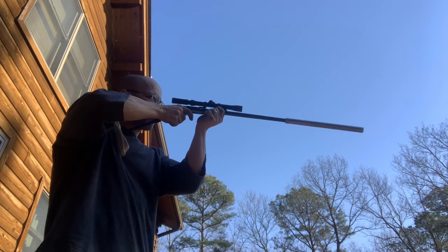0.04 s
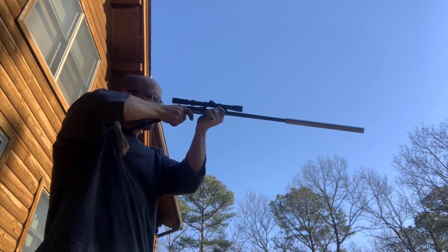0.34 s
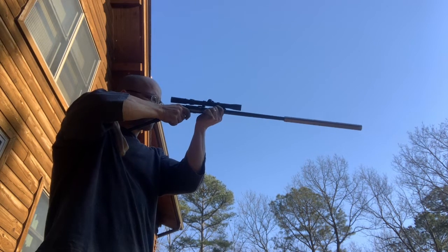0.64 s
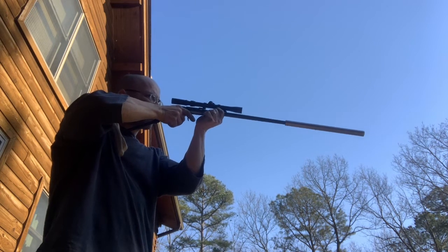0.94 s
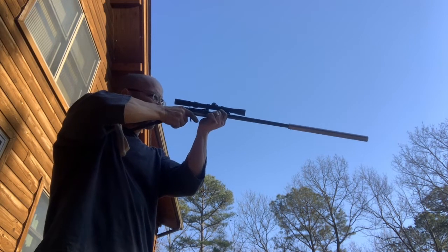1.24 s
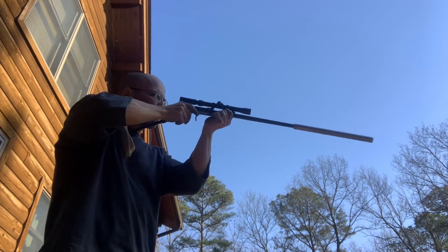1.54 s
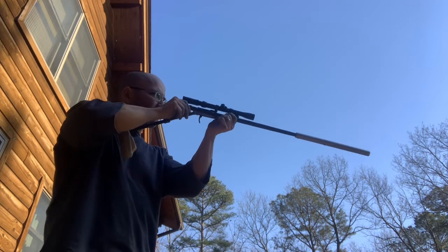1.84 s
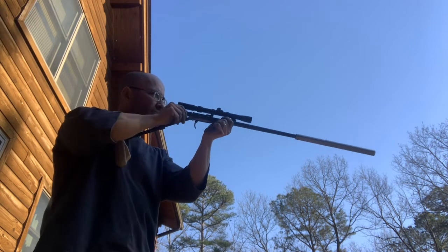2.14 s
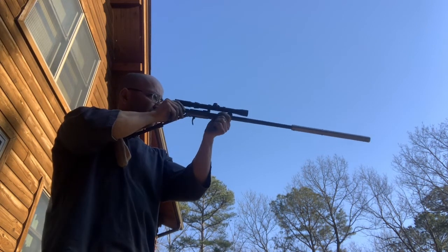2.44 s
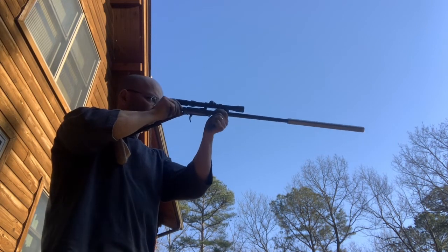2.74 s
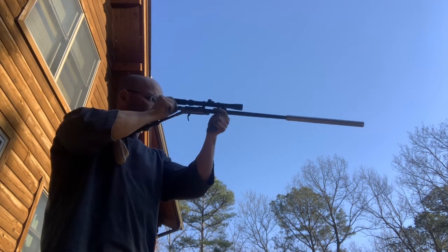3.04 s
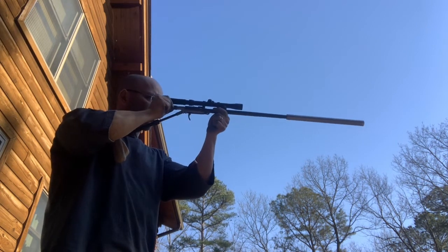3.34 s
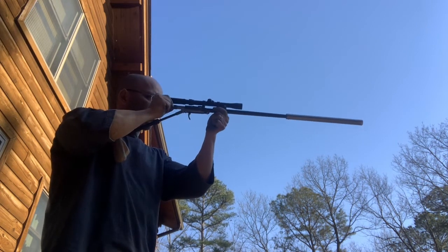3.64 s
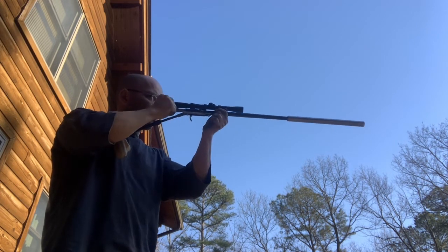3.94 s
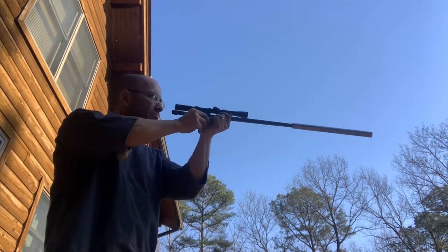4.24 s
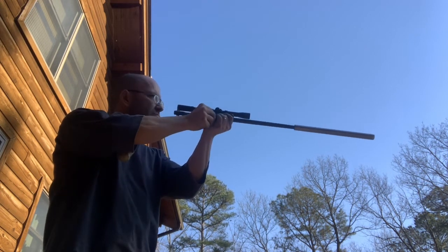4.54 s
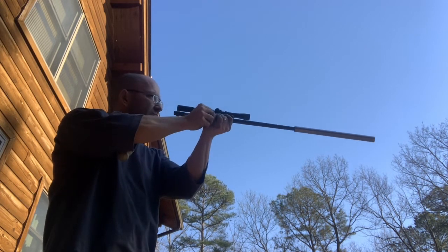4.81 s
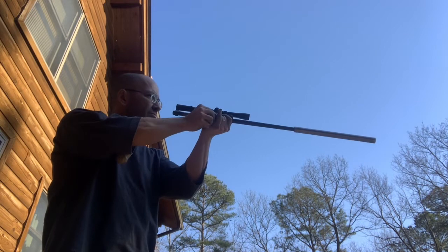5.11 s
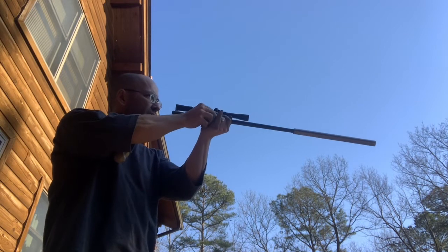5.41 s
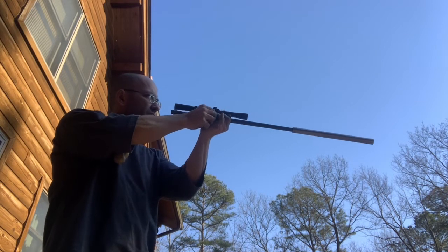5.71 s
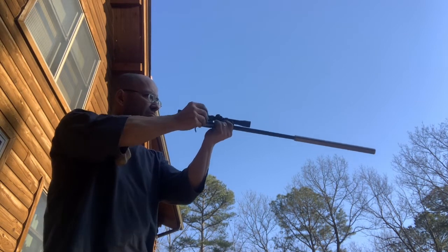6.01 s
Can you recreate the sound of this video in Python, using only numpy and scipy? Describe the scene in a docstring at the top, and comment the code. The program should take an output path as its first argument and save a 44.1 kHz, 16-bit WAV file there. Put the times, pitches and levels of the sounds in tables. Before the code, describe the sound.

Over a low outdoor hush, a suppressed bolt-action rifle fires once with a sharp crack and a short thump. The report slaps back from the yard, returns from the trees and rolls away into the woods. The bolt is then worked with faint steel slides and a sharp click. A brass case rings out and bounces four times on hard ground, before one last soft slide of the bolt. The microphone is near the shooter.

```python
"""One shot from a suppressed bolt-action rifle beside a timber house, facing a line of bare trees.
Over a low outdoor hush the striker falls; at 0.6 s gas bursts from the suppressor with a crack and thump.
The report returns from the yard, then from the trees, and rolls away in the woods. From 2 s the bolt
is worked, steel on steel. At 3.1 s the brass case is flicked out ringing; it bounces four times
on hard ground before a last faint slide of the bolt. The house wall scatters these small sounds."""
import sys
import numpy as np
from scipy import signal
from scipy.fft import rfft, irfft
from scipy.io import wavfile
from scipy.ndimage import uniform_filter1d

SR = 44100
rng = np.random.default_rng(int(sys.argv[2]) if len(sys.argv) > 2 else 0)


def int16_out(signal):
    """Quantize to a 16-bit WAV file."""
    q = np.round(np.clip(np.atleast_2d(signal).T, -1, 1) * 32767)
    wavfile.write(sys.argv[1], SR, q.astype(np.int16))


N = 267502
T = np.arange(N) / SR
HZ = np.maximum(np.fft.rfftfreq(N, 1 / SR), 1)
SHORT = 2 ** 15   # samples per short event
SHORT_T = np.arange(SHORT) / SR
SHORT_HZ = np.maximum(np.fft.rfftfreq(SHORT, 1 / SR), 1)
MUZZLE_S, WOODS_PEAK_S = .6002, .66


def from_db(db):
    """Decibels to gain."""
    return 10 ** (np.asarray(db) / 20)


def rms_one(x):
    """Scale to unit rms."""
    return x / np.sqrt(np.mean(x ** 2) + 1e-20)


def at_hz(points, hz, column=1):
    """Interpolate a table column over log frequency."""
    table = np.array(points)
    return np.interp(np.log(hz), np.log(table[:, 0]), table[:, column])


def resonances(modes, hz):
    """Gain of resonant peaks, summed in power."""
    return np.sqrt(sum(from_db(db) ** 2 / (1 + (centre / width * (hz / centre - centre / hz)) ** 2)
                       for centre, width, db in modes))


def resonate(x, modes):
    """Ring x through parallel resonators, signs alternating."""
    out = 0
    for k, (hz, width_hz, db) in enumerate(modes):
        r = np.exp(-np.pi * width_hz / SR)
        poles = [1, -2 * r * np.cos(2 * np.pi * hz / SR), r * r]
        out += (-1) ** k * from_db(db) * (1 - r * r) / 2 * signal.lfilter([1, 0, -1], poles, x)
    return out


def noise(gain):
    """Unit-rms random-phase noise, shaped by a gain per bin."""
    return rms_one(irfft(gain * np.exp(2j * np.pi * rng.random(len(gain)))))


def flicker(size, rms_db, smooth_samples):
    """Randomly wandering gain."""
    return from_db(rms_db * rms_one(uniform_filter1d(rng.standard_normal(size), smooth_samples)))


def tilted(gain, db_per_oct):
    """Tilt a short spectrum about 1 kHz; constant gain below 200 Hz."""
    return gain * from_db(db_per_oct * np.log2(np.maximum(SHORT_HZ, 200) / 1000))


def fade(t, t60_s):
    """Silence before t = 0, then exponential decay."""
    return (t >= 0) * np.exp(-np.log(1000) * np.maximum(t, 0) / t60_s)


def swell(t, rise_s, t60_s):
    """Gaussian rise to t = 0, then exponential decay."""
    return np.where(t < 0, np.exp(-.5 * (t / rise_s) ** 2), fade(t, t60_s))


def struck_mode(t, hz, db, t60_s):
    """One mode struck at t = 0."""
    return from_db(db) * np.sin(2 * np.pi * hz * t) * fade(t, t60_s)


def add(out, start_s, sound):
    """Mix a sound into out."""
    i = max(round(start_s * SR), 0)
    out[i:i + len(sound)] += sound[:N - i]


def shot(striker_s=.5798, tube_s=.5955, gas_peak_s=.5985, build_db_per_s=1550):
    """The striker ticks; gas builds in the suppressor, rings its tube and peaks in a crack and thumps."""
    # Each row: frequency in Hz, spectral level in dB.
    crack_spectrum = [(200, -16.5), (1500, -14), (2900, 1.5), (3900, -12), (5700, -1.5), (7500, -3),
                      (10300, -6.5), (12500, -9.5), (15200, -2), (17000, -12.5)]
    # Suppressor gas resonances. Each row: centre in Hz, width in Hz, level in dB.
    gas_modes = [(160, 76, -4), (270, 170, 2), (464, 85, -2.5), (740, 180, -9.5), (1310, 180, -1.5),
                 (1834, 130, -0.5), (2491, 110, 1.5), (2713, 43, 6.5), (3280, 89, 3), (5760, 950, -7),
                 (8100, 330, -1.5), (10532, 1200, -10)]
    # Tube rung by bullet and gas. Each row: frequency in Hz, peak in dB, t60 in seconds.
    tube_modes = [(1294, -20.5, .02), (2790, -12.5, .025)]
    # Ringing of the report. Each row: frequency in Hz, peak in dB, t60 in seconds.
    thumps = [(51.37, -25.5, 0.087), (167, -29, .1), (446.6, -12.5, .03), (5800, -11, 0.0054)]
    out, t = np.zeros(N), striker_s + SHORT_T
    colour = from_db(at_hz(crack_spectrum, SHORT_HZ))
    striker = from_db(-33) * noise(colour) * fade(SHORT_T, t60_s=.014)
    build = from_db(-build_db_per_s * np.maximum(gas_peak_s - t, 0))
    drain = fade(np.maximum(t - gas_peak_s, 0), t60_s=.052)
    gas = from_db(-13.5) * build * drain * noise(resonances(gas_modes, SHORT_HZ))
    crack = from_db(-9.5) * noise(colour) * swell(t - MUZZLE_S, rise_s=.0011, t60_s=.016)
    add(out, striker_s, striker + gas + crack)
    for hz, db, t60_s in tube_modes:
        out += struck_mode(T - tube_s, hz, db, t60_s)
    for hz, db, t60_s in thumps:
        lag_s = .0072 * np.sqrt(100 / hz)   # lower thumps start later
        out += struck_mode(T - MUZZLE_S - lag_s, hz, db, t60_s)
    return out


def echo(peak_s, db, rise_s, t60_s, db_per_oct):
    """A grainy cloud of small reflections of the report."""
    # Each row: frequency in Hz, spectral level in dB.
    echo_spectrum = [(60, -23.5), (120, -16.5), (220, -0.5), (500, 5), (620, -6), (1150, -3.5),
                     (2100, -7.5), (3000, 1.5), (4200, -7.5), (5900, -2.5), (8000, -6.5), (10000, -4),
                     (12000, -12), (16000, -13.5)]
    out, lead_s = np.zeros(N), .1
    grain = rms_one(flicker(SHORT, rms_db=1.5, smooth_samples=40))
    colour = tilted(from_db(at_hz(echo_spectrum, SHORT_HZ)), db_per_oct)
    envelope = from_db(db) * swell(SHORT_T - lead_s, rise_s, t60_s)
    add(out, peak_s - lead_s, noise(colour) * grain * envelope)
    return out


def yard(slap_s=.6438):
    """Nearby surfaces return the report, one as a hard slap with a hollow ring."""
    # Each row: peak time in seconds, level in dB.
    broad_returns = [(.6212, -17.5), (.639, -17), (.652, -16)]
    out = echo(slap_s, db=-11.5, rise_s=.0012, t60_s=.023, db_per_oct=-1.5)
    out += struck_mode(T - slap_s, hz=503, db=-21.5, t60_s=.12)
    for peak_s, db in broad_returns:
        out += echo(peak_s, db, rise_s=.0055, t60_s=.076, db_per_oct=-.27)
    return out


def trees(far_s=1.4, far_gap_s=.16, far_db=-67.5, far_loss_db_per_s=8, far_rise_s=.027):
    """Twigs return mostly treble; far stands ring longer, deep or far ones are duller."""
    # Each row: peak time in seconds, level in dB, rise in seconds (longer for a deeper stand).
    stands = [(.6865, -20.5, .0004), (.706, -20.5, .009), (.785, -30, 0.013), (.853, -34, 0.0018),
              (.93, -36, 0.003), (1.015, -41.5, 0.026), (1.187, -53, 0.0033), (1.225, -53, 0.023)]
    lags_s = far_gap_s * (np.arange(3) + rng.uniform(-.025, .099, size=3))
    far_stands = [(far_s + lag_s, far_db - far_loss_db_per_s * lag_s, far_rise_s) for lag_s in lags_s]
    out = np.zeros(N)
    for peak_s, db, rise_s in list(stands) + far_stands:
        travel_s = peak_s - MUZZLE_S
        depth_doublings = np.log2(rise_s / .001)
        db_per_oct = 13 - 1.82 * depth_doublings - 1.5 * travel_s
        out += echo(peak_s, db, rise_s, t60_s=.14 + .45 * travel_s, db_per_oct=db_per_oct)
    return out


def woods(rise_s=.013, roll_t60_s=3.16):
    """Diffuse reverberation dies band by band; a faint, uneven roll lingers from far away."""
    # Each row: frequency in Hz, spectral level in dB, t60 in seconds.
    reverb_bands = [(50, -24, .3), (120, -12, .45), (280, 5, 0.46), (507, 1, .65), (901, -1.5, 1),
                    (2080, -3.5, 0.94), (3100, 2, 0.88), (4374, -8, .7), (6000, -2, 0.64),
                    (10000, -8.5, 0.64), (16000, -15.5, 0.6)]
    # Each row: frequency in Hz, spectral level in dB.
    roll_spectrum = [(100, -14.5), (270, 0), (500, -1), (1200, 2), (3100, -3.5), (4300, -12.5),
                     (6500, -11.5), (10000, -13.5), (16000, -20.5)]
    size = 2 ** 17
    t = np.arange(size) / SR + MUZZLE_S - WOODS_PEAK_S
    hz = np.maximum(np.fft.rfftfreq(size, 1 / SR), 1)
    reverb = from_db(-25) * rfft(noise(from_db(at_hz(reverb_bands, hz))))
    roll = from_db(-48) * rfft(noise(from_db(at_hz(roll_spectrum, hz))))
    edges_hz = 30 * 2 ** np.arange(0, 10, .66)
    tail, out = 0, np.zeros(N)
    for low, high in zip(edges_hz, edges_hz[1:]):
        band = (hz >= low) & (hz < high)
        t60_s = at_hz(reverb_bands, np.sqrt(low * high), column=2)
        clumps = flicker(size, rms_db=1.5, smooth_samples=900)   # trees stand in groups
        tail += irfft(reverb * band) * swell(t, rise_s, t60_s)
        tail += irfft(roll * band) * swell(t, rise_s, roll_t60_s) * clumps
    add(out, MUZZLE_S, tail)
    return out


def low_ring():
    """A narrow, wavering low ring hangs under the tail."""
    # One row: centre in Hz, width in Hz, level in dB.
    ring_mode = [(266, 22, 0)]
    envelope = from_db(-62) * swell(T - WOODS_PEAK_S, rise_s=.03, t60_s=5)
    return noise(resonances(ring_mode, HZ) ** 2) * envelope


def bolt(chatter_gap_s=.011, scrape_low_hz=1800):
    """Steel knocks and slides, each with a dying chatter, ring the modes of the action."""
    # Each row: start in seconds, level in dB, t60 in seconds (long for a slide), tilt in dB per octave.
    strokes = [(2.002, -58.5, 0.14, -2), (2.3752, -59, 0.029, -5), (2.438, -41, 0.0097, -4.5),
               (2.56, -68, 0.16, 5), (3.0873, -35.5, .008, 0), (3.096, -23, .01, 3), (4.931, -51, .11, -5)]
    # Each row: centre in Hz, width in Hz, level in dB.
    action_modes = [(1220, 610, -6.5), (1920, 430, -4.5), (3200, 480, -4), (4055, 280, -2),
                    (5320, 1060, -3.5), (6250, 310, 6), (7160, 650, -1.5), (9050, 200, 4), (9616, 260, 3),
                    (10600, 510, 0.5), (13200, 940, -8), (14700, 450, 2), (15500, 500, -15)]
    contacts, steel = np.zeros(N), resonances(action_modes, SHORT_HZ)
    for start_s, db, t60_s, tilt in strokes:
        chatter = [(start_s + chatter_gap_s * (k + 1), db - 9 - 4 * k, tilt + 1) for k in range(4)]
        for hit_s, hit_db, db_per_oct in [(start_s, db, tilt)] + chatter:
            force = tilted(1, db_per_oct)
            steel_share = np.sqrt(np.sum((force * steel) ** 2) / np.sum(force ** 2))
            add(contacts, hit_s, from_db(hit_db) / steel_share * noise(force) * fade(SHORT_T, t60_s))
    contacts += 1e-18 * rng.standard_normal(N)   # avoids denormals
    scrape = signal.sosfilt(signal.butter(2, scrape_low_hz, "high", fs=SR, output="sos"), contacts)
    return resonate(contacts, action_modes) + from_db(-15) * scrape


def brass_case(eject_s=3.0985, high_hz=12560, split_hz=75, rebound_s=.0046, low_cut_hz=2800):
    """The case rings as it is flicked out; at each landing it hits base first, then tips onto its mouth."""
    # Each row: start in seconds, base in dB, tipping time in seconds, mouth in dB, mouth ring in dB.
    landings = [(3.695, -25.5, .006, -57, -36), (3.980, -51.5, .022, -46, -50.5),
                (4.3619, -40.5, .025, -50.5, -41.5), (4.6573, -57, .038, -50.5, -62)]
    # Each row: frequency in Hz, spectral level in dB.
    tick_spectrum = [(1000, -38), (3000, -13), (4700, 8), (6000, 9), (8000, 3.5), (11000, -0.5),
                     (13300, -6), (15000, 12), (17000, -28)]
    # Low modes, damped by the ground. Each row: frequency in Hz, level in dB, t60 in seconds.
    shell_modes = [(4680, -15, 0.013), (5086, 2, 0.016), (5240, -14, .015), (6090, -20, .012)]
    out, tick = np.zeros(N), from_db(at_hz(tick_spectrum, SHORT_HZ))
    hardest_db = max(row[1] for row in landings)
    shell = sum(struck_mode(SHORT_T, *mode) for mode in shell_modes)

    def ring(db, t60_s):
        """The slightly oval mouth splits the high mode into a beating pair."""
        phases = rng.uniform(0, 2 * np.pi, size=2)
        main = np.sin(2 * np.pi * high_hz * SHORT_T + phases[0])
        twin = np.sin(2 * np.pi * (high_hz + split_hz) * SHORT_T + phases[1])
        return from_db(db) * (main + from_db(-8) * twin) * fade(SHORT_T, t60_s)

    def touch(tick_db, shell_db, ring_db):
        """One ground contact; softer ones are duller."""
        colour = tilted(tick, db_per_oct=.13 * (tick_db - hardest_db))
        click = from_db(tick_db) * noise(colour) * fade(SHORT_T, t60_s=.011)
        return click + from_db(shell_db) * shell + ring(ring_db, t60_s=.15)

    add(out, eject_s, ring(db=-35, t60_s=.074))
    for start_s, base_db, tip_s, mouth_db, ring_db in landings:
        tick_db = base_db - .44 * (hardest_db - base_db)
        add(out, start_s, touch(tick_db, base_db, base_db - 11.5))
        for lag_s, db in [(-rebound_s, -4), (0, 0), (rebound_s, -4)]:   # the mouth grazes, lands, skips
            add(out, start_s + tip_s + lag_s, from_db(db) * touch(mouth_db, mouth_db - 3, ring_db))
    # so small a shell radiates no bass
    return signal.sosfilt(signal.butter(3, low_cut_hz, "high", fs=SR, output="sos"), out + 1e-18)


def house_wall(x, delay_s=.0015, late_cut_hz=8000):
    """Siding and eaves scatter small sounds straight back; the yard adds a faint, duller tail."""
    early, late = rng.standard_normal((2, SHORT))
    early *= fade(SHORT_T - delay_s, t60_s=.1)
    late *= fade(SHORT_T - delay_s, t60_s=.32)
    late = signal.sosfilt(signal.butter(2, late_cut_hz, fs=SR, output="sos"), late / np.linalg.norm(late))
    response = from_db(-4) * early / np.linalg.norm(early) + from_db(-13) * late
    return x + signal.fftconvolve(x, response)[:N]


def background(gain_dip_s=2.15, gain_dip_width_s=.8):
    """Distant rumble, a soft outdoor hush and a few dull bumps."""
    # Each row of both: frequency in Hz, spectral level in dB.
    rumble_spectrum = [(20, -48), (30, -27), (40, -14), (65, 2.5), (95, 2), (130, -7.5), (200, -17),
                       (400, -40)]
    hush_spectrum = [(90, -12.5), (140, -4), (220, -3.5), (450, -6.5), (820, -7.5), (1400, -12.5),
                     (2100, -18.5), (3200, -21), (5200, -25.5), (6600, -24), (8200, -27.5), (11000, -29.5),
                     (14000, -27), (16000, -29)]
    # Each row: peak time in seconds, level in dB, t60 in seconds, centre in Hz.
    bumps = [(.36, -59, 0.57, 70.4), (.46, -56.5, .2, 75), (3.351, -58, .08, 219), (3.378, -56, 0.12, 119)]
    # the background dips after the shot and swells back, probably as the recorder's gain recovers
    gain_dip = np.exp(-.5 * ((T - gain_dip_s) / gain_dip_width_s) ** 2)
    rumble = from_db(-62.5 - 4.5 * gain_dip) * noise(from_db(at_hz(rumble_spectrum, HZ)))
    hush = from_db(-62 - 2.5 * gain_dip) * noise(from_db(at_hz(hush_spectrum, HZ)))
    out, lead_s = rumble + hush, .02
    for peak_s, db, t60_s, hz in bumps:
        envelope = from_db(db) * swell(SHORT_T - lead_s, rise_s=.0044, t60_s=t60_s)
        add(out, peak_s - lead_s, noise(resonances([(hz, hz, 0)], SHORT_HZ) ** 2) * envelope)
    return out


def scene():
    """The shot and its returns, then small metal sounds by the wall, over the background; mono."""
    report = shot() + yard() + trees() + woods() + low_ring()
    return (report + house_wall(bolt() + brass_case()) + background())[None]


def record(dry, low_cut_hz=35, high_cut_hz=15900):
    """The microphone drops the deepest bass; peaks are rounded and the top treble is cut."""
    heard = signal.sosfilt(signal.butter(3, low_cut_hz, "high", fs=SR, output="sos"), dry)
    return signal.sosfilt(signal.ellip(12, .1, 80, high_cut_hz, fs=SR, output="sos"), np.tanh(heard))


dry = scene()
out = record(dry)
int16_out(out)
```